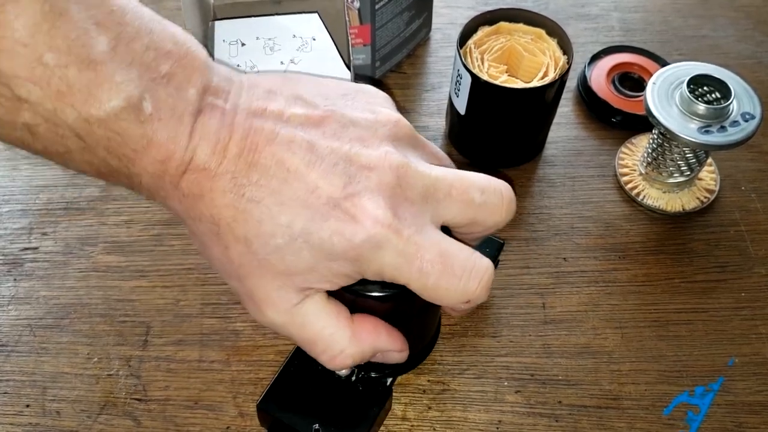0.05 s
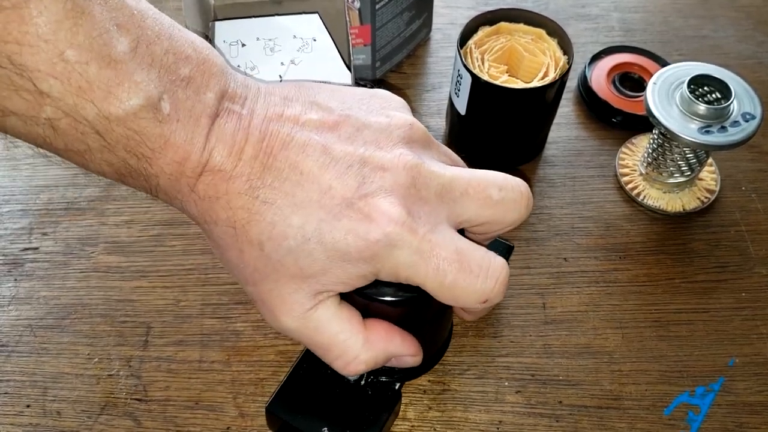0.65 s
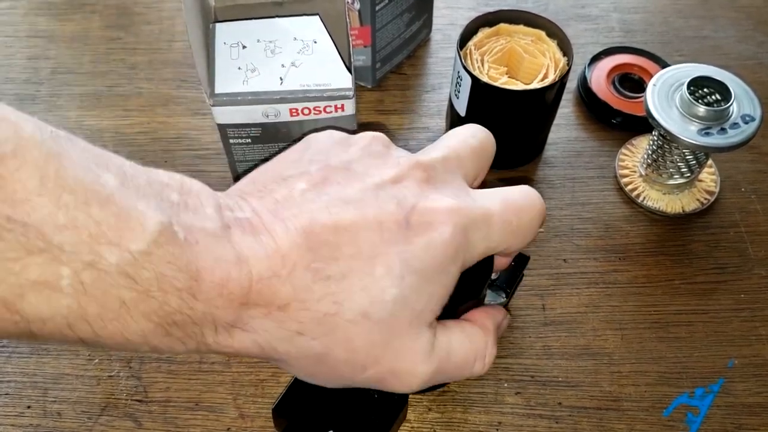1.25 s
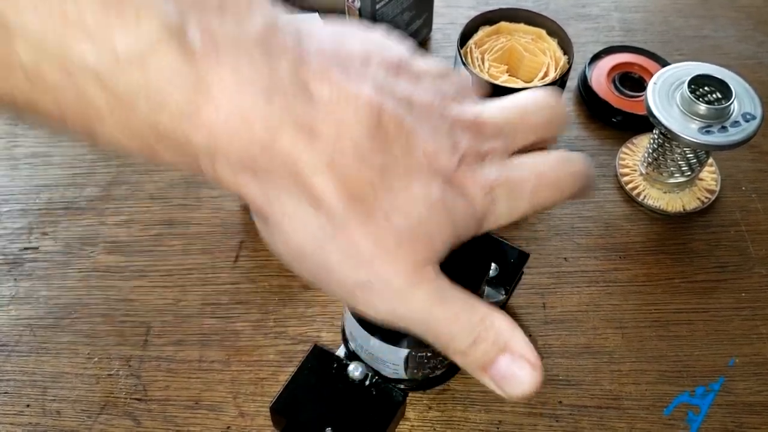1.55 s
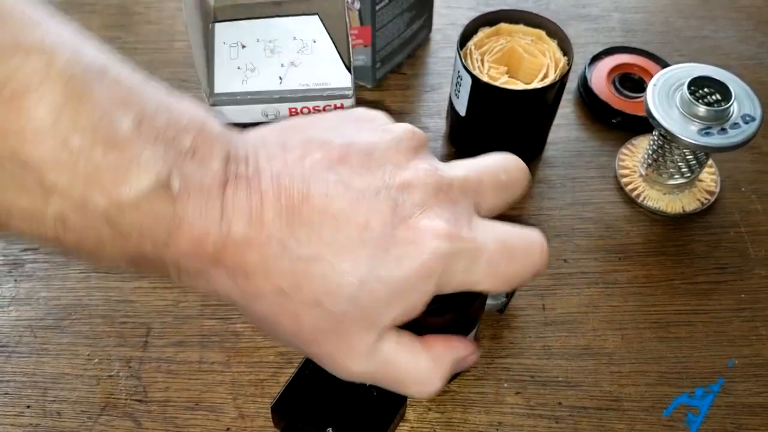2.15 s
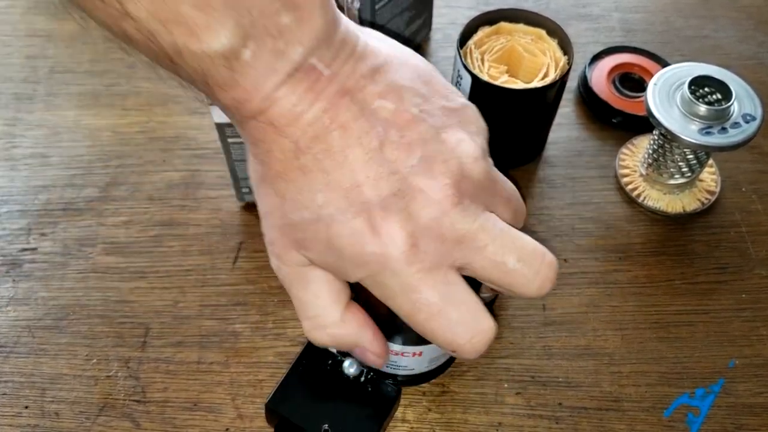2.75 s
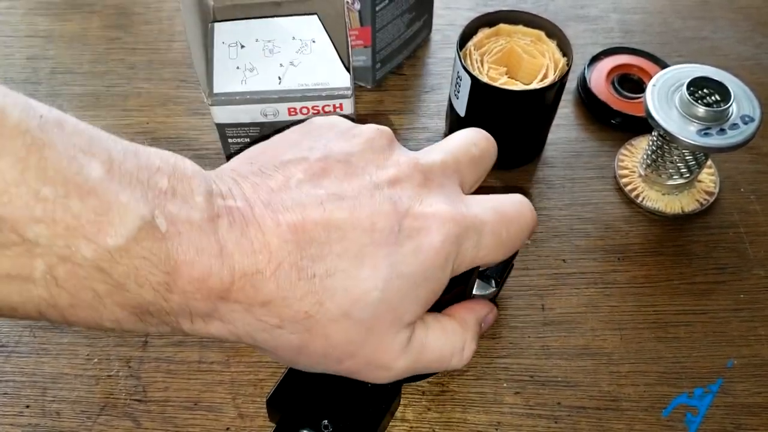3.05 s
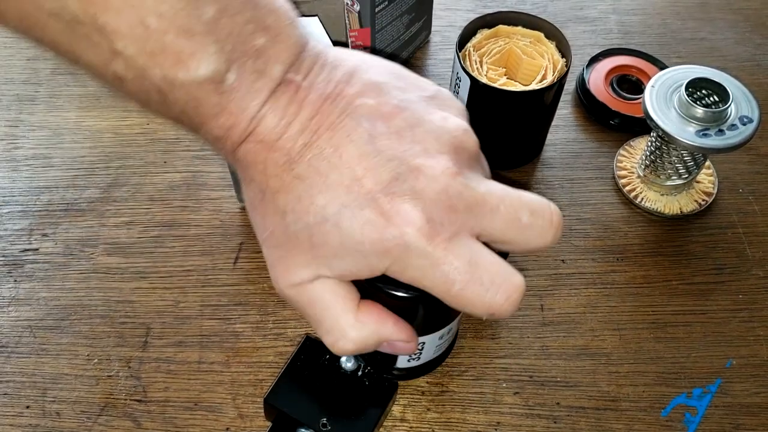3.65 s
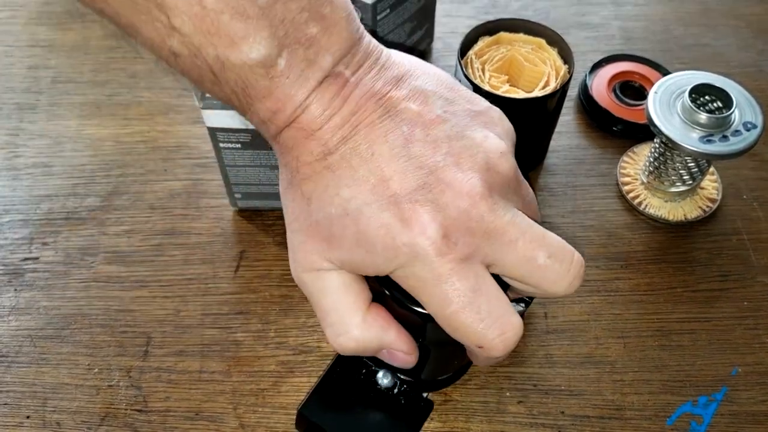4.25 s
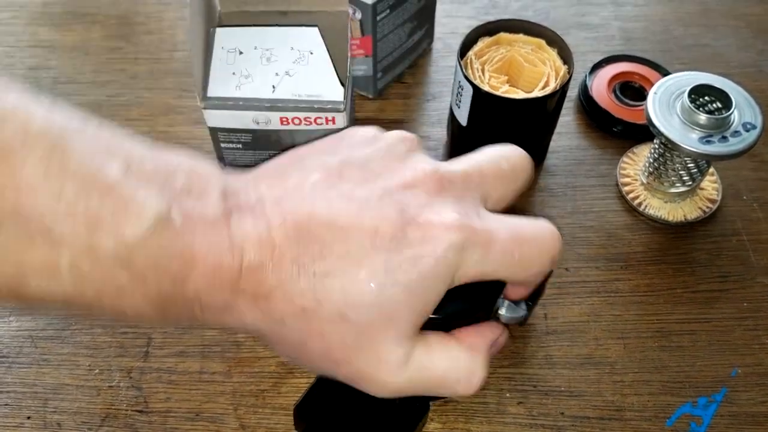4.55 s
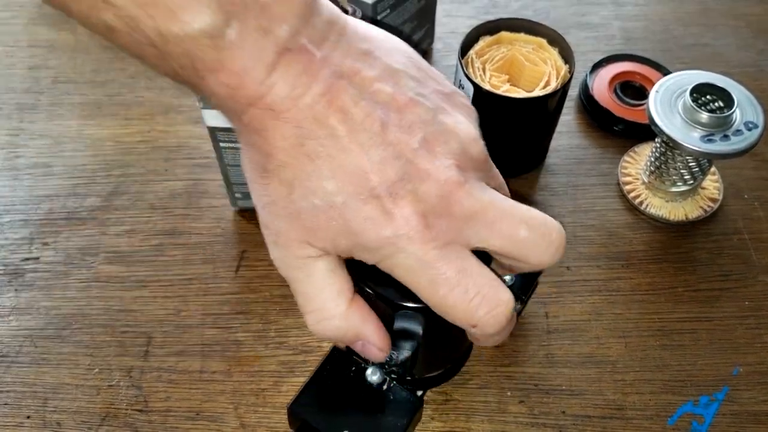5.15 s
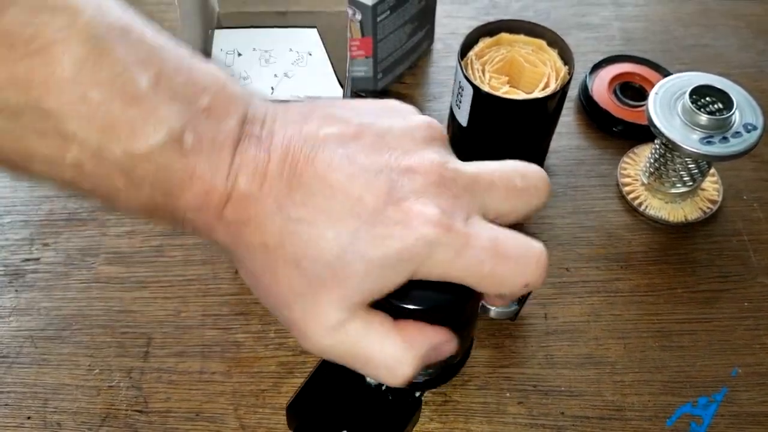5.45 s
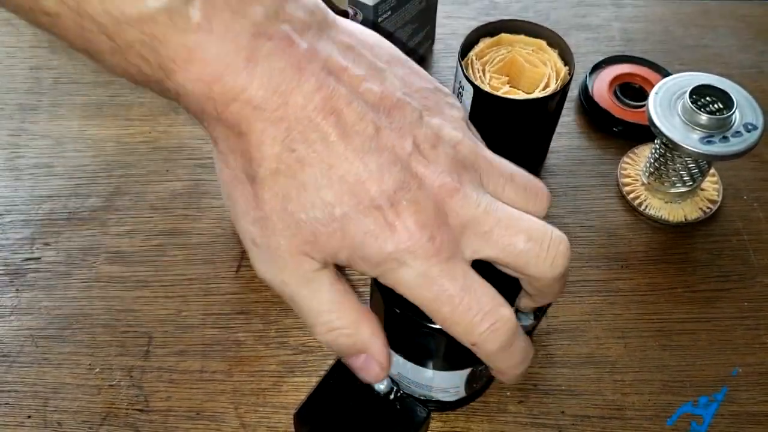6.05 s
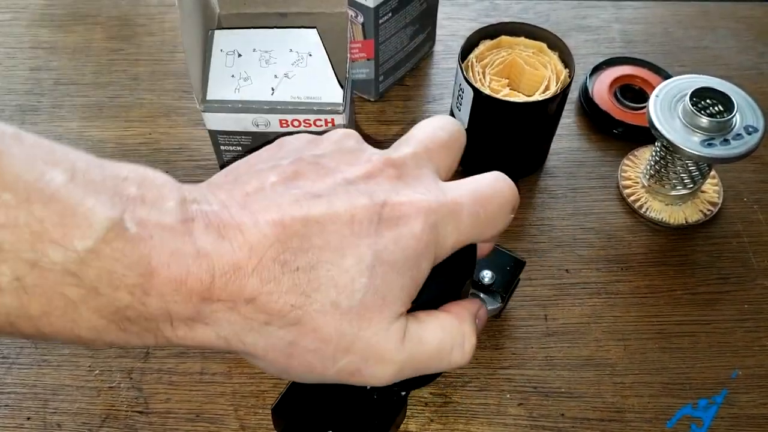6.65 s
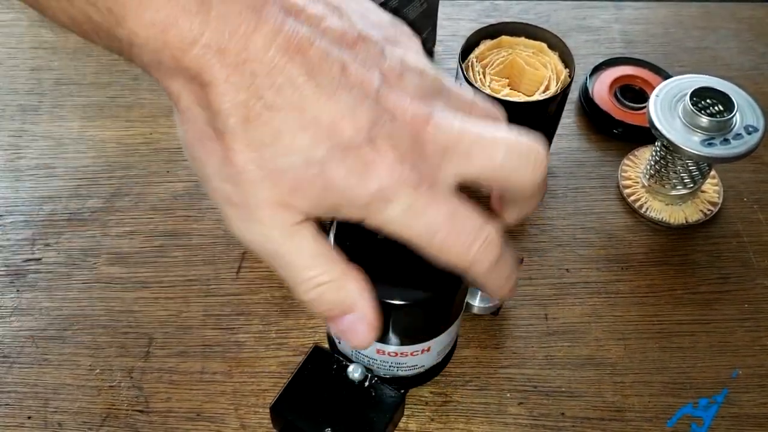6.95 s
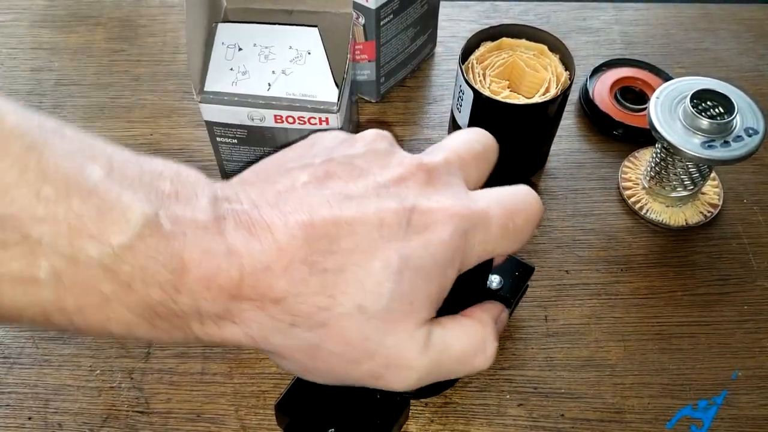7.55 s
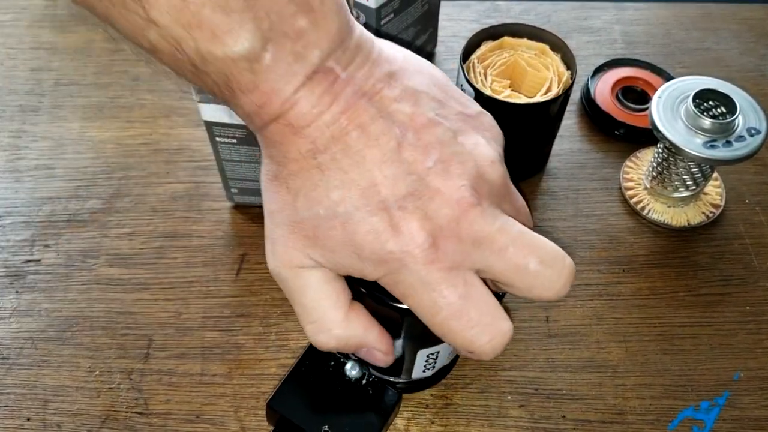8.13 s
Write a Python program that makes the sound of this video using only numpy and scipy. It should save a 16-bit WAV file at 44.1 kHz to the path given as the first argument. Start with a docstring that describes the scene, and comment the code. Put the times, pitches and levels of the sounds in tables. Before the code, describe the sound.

A hand twists a steel oil filter against a cutting wheel on a wooden bench, regripping about once a second. At first the wheel rumbles softly, the can knocks in its jig, and sliding skin and faint clicks come between. From about halfway, the wheel snaps loudly past the torn edge on each turn, with a brief metallic ring. A last quiet twist follows, heard in stereo in a quiet garage.

```python
"""A garage, a stereo pair of microphones at a wooden bench: a hand twists a steel oil filter against a
cutting wheel, regripping about once a second. At first the wheel rumbles in its groove, the can knocks
in the jig, skin and steel hiss softly as they slide, and snaps are faint. From about 4.6 s the wall is
cut through and the wheel snaps loudly past the torn edge on every turn. A last, quiet twist follows."""
import sys
import numpy as np
from scipy import signal
from scipy.fft import rfft, irfft, next_fast_len
from scipy.io import wavfile
from scipy.ndimage import uniform_filter1d

SR = 44100
rng = np.random.default_rng(int(sys.argv[2]) if len(sys.argv) > 2 else 0)


def generate_wav(signal):
    """Clip the signal to [-1, 1] and save it as 16-bit WAV at the path in sys.argv[1]."""
    frames = np.transpose(np.atleast_2d(signal))
    scaled = np.clip(frames, -1, 1) * 32767
    pcm = np.round(scaled).astype(np.int16)
    wavfile.write(sys.argv[1], SR, pcm)


N = 369990
BLOW, ATTACK = 16384, 1100  # samples: a whole blow, and the opening that sets its level

# modes of bench, jig and can: f/Hz, level/dB, t60/s
BENCH_MODES = [(55, -11, 0.017), (94.27, -0.5, 0.17), (163, 0.5, 0.081), (220.5, 5, 0.14), (288.2, 3, 0.12),
               (331.4, -8.5, 0.027), (363.2, 3.5, 0.14), (410, -6, 0.27), (475, -7, 0.21), (543, -3, 0.02),
               (657, -4, 0.023), (753, -17, 0.058), (934.4, -15, 0.19), (984, -13, 0.22), (1258, -17, 0.3),
               (1413, -12.5, .08), (1550, -23.5, 0.012)]
# spectrum of steel cracking under the wheel: f/Hz, level/dB
CRACK_SPECTRUM = [(300, -26), (1000, -9.5), (2200, -7), (4500, -1.5), (7500, 6), (9000, -1.5), (12000, 5),
                  (16000, -7.5)]
# twists of the hand: t/s, length/s, rumble/dB, length of the first bite/s, its scrape/dB, its hiss/dB
TWISTS = [(0.4, 0.27, -53.5, 0.16, -68, -111), (1.124, 0.25, -42, 0.11, -61, -70),
          (2.127, 0.38, -49, 0.21, -67, -65.5), (2.71, 0.72, -48.5, 0.12, -67.5, -75),
          (3.575, 0.13, -57, 0.26, -74, -76), (4.249, 0.72, -49.5, 0.054, -55.5, -80.5),
          (5.267, 0.81, -53.5, 0.0705, -59, -72.5), (6.22, 0.76, -52, 0.14, -53.5, -69.5),
          (7.181, 0.84, -53, 0.11, -69, -77.5), (8.146, 0.59, -56, 0.094, -58, -70.5)]


def amp(db):
    return 10 ** (np.asarray(db) / 20)


def unit(x, start=0, end=None):
    """Scales a sound to rms 1 over a stretch of samples."""
    return x / np.sqrt(np.mean(x[..., start:end] ** 2) + 1e-20)


def curve(points, hz):
    """Joins points by straight lines over log frequency."""
    f, value = np.transpose(points)
    return np.interp(np.log(hz + 1), np.log(f + 1), value)


def add(mix, s, sound):
    """Lays a sound into the mix at time s."""
    part = mix[:, max(0, round(s * SR)):][:, :sound.shape[1]]
    part += sound[:, :part.shape[1]]


def diffuse(spectrum, size, count=1, tilt=0):
    """Noises at both microphones, count x 2 x size; tilt is in dB per octave above 5 kHz."""
    # likeness of the microphones, high in the bass: f/Hz, correlation
    likeness = [(30, 0.95), (70, .94), (150, .92), (330, 0.64), (640, 0.39), (1400, 0), (15000, 0.0019)]
    length = next_fast_len(size, real=True)
    hz = np.fft.rfftfreq(length, 1 / SR)
    bins = rng.standard_normal((count, 2, 2 * len(hz)), dtype=np.float32).view(np.complex64)
    same = np.clip(curve(likeness, hz), -1, 1)
    bins[:, 1] = same * bins[:, 0] + np.sqrt(1 - same ** 2) * bins[:, 1]
    tilt_db = np.reshape(tilt, (-1, 1, 1)) * np.log2(np.maximum(hz / 5000, 1))
    gain = np.float32(amp(curve(spectrum, hz) + tilt_db))
    return unit(irfft(bins * gain, length)[..., :size])


def grit(per_s, spread_db, decay_s):
    """Envelope of random catches of uneven size, each swelling and dying quickly."""
    catches = (rng.random(N) < per_s / SR) * amp(spread_db * np.minimum(rng.exponential(1, N), 3))
    power = signal.lfilter([1], [1, -np.exp(-2 / (decay_s * SR))], catches ** 2)
    return unit(uniform_filter1d(np.sqrt(power), max(1, int(decay_s * SR / 4))))


def ringing(modes):
    """One dying sine for each mode."""
    hz, db, t60 = np.transpose(modes)[:, :, None]
    t = np.arange(BLOW) / SR
    return amp(db - 60 * t / t60) * np.sin(2 * np.pi * hz * t)


def resonant(spectrum, modes, peak_db):
    """Raises a spectrum around each mode: the body colours whatever passes through it."""
    hz = np.geomspace(20, 16000, 3000)
    peaks = np.max([1 / (1 + ((hz - f) * t60 / 1.1) ** 2) for f, _, t60 in modes], axis=0)
    return np.c_[hz, curve(spectrum, hz) + peak_db * peaks]


def favour(x, hz, q):
    """The point of contact favours the range around one pitch."""
    return signal.lfilter(*signal.iirpeak(hz, max(q, 2.5 * hz / SR), SR), x)


def swing(hz, decay_cycles=0.72):
    """A push that swells and is damped within a few swings."""
    cycles = hz * np.arange(BLOW) / SR
    return unit(cycles * np.exp(-cycles / decay_cycles) * np.sin(2 * np.pi * cycles), end=ATTACK)


def effort(t, rest_db=-76, ease_db=15):
    """The hand's force at times t: it arches over each twist, ease_db weaker at both ends."""
    start, length, db = np.transpose(TWISTS)[:3, :, None]
    return amp(rest_db) + amp(db - ease_db * (2 * (t - start) / length - 1) ** 2).sum(0)


def room_tone(level_db=-76.5):
    """The quiet, steady air of the garage all around the microphones."""
    # spectrum of the air: f/Hz, level/dB
    air_spectrum = [(20, -12.5), (60, -2), (100, -3.5), (200, -11), (350, -15.5), (520, -24.5),
                    (1000, -29.5), (1900, -28), (2600, -21.5), (3400, -37.5), (5200, -34), (7400, -26),
                    (9000, -34.5), (15500, -33)]
    return amp(level_db) * diffuse(air_spectrum, N)[0]


def garage_tails(spectrum, count, rise_s, tilt=0):
    """One fresh reverberation for each blow, every band dying at its own speed."""
    # reverberation of the garage: f/Hz, t60/s
    reverb_times = [(90, 0.38), (450, 0.31), (4000, 0.29), (14000, 0.21)]
    t, hz = np.arange(BLOW) / SR, np.fft.rfftfreq(BLOW, 1 / SR)
    noise = rfft(diffuse(spectrum, BLOW, count, tilt))
    centres, t60s = np.transpose(reverb_times)
    bands = np.float32([curve(np.c_[centres, share], hz) for share in np.eye(len(centres))])
    fades = np.float32(amp(-60 * t / t60s[:, None]) * (1 - np.exp(-t / rise_s)))
    return sum(irfft(noise * band) * fade for band, fade in zip(bands, fades))


def burr_ticks(gain_db=-31):
    """Burrs in the groove catch the wheel: sparse tiny ticks that follow the effort."""
    ticks = diffuse(CRACK_SPECTRUM, N, tilt=-5)[0] * grit(per_s=34, spread_db=3, decay_s=0.005)
    return ticks * effort(np.arange(N) / SR) * amp(gain_db)


def friction(scrape_gain_db=1, hiss_gain_db=-1, drag_scrape_db=-25, drag_hiss_db=-28.5):
    """The wheel scrapes and skin hisses on paint, swelling at each bite or slip over a turning drag."""
    # the fingers slip over the paint: t/s, length/s, scrape/dB, hiss/dB
    slips = [(0, 0.18, -67, -76), (0.858, 0.19, -64, -63), (1.45, 0.2, -57, -68),
             (1.867, 0.14, -108, -77.5), (2.432, 0.15, -68.5, -72.5), (2.91, 0.093, -57.5, -76),
             (3.227, 0.17, -59, -72.5), (4.398, 0.25, -65, -75), (5.533, 0.17, -47, -53),
             (7.399, 0.088, -62, -72), (8.275, 0.13, -69, -76.5)]
    # grainy scrape of the wheel: f/Hz, level/dB
    scrape_spectrum = [(150, -6), (380, 6), (520, -5.5), (820, -5), (1250, -10.5), (1900, -16.5),
                       (2600, -19.5), (4000, -28), (8000, -42.5), (14000, -59.5)]
    # smoother hiss of skin: f/Hz, level/dB
    skin_spectrum = [(600, -11), (1800, -2), (2600, 1.5), (4200, -2), (7600, 4), (8900, -5), (11600, 0.5),
                     (16000, -7.5)]
    bites = [(start, length, scrape, hiss) for start, _, _, length, scrape, hiss in TWISTS]
    start, length, scrape_db, hiss_db = np.transpose(bites + slips)[:, :, None]
    frames, t = np.arange(0, N, 128) / SR, np.arange(N) / SR
    strokes = np.exp(-(2 * (frames - start) / length - 1) ** 2)
    scrape = (amp(scrape_db + scrape_gain_db) * strokes).sum(0) + amp(drag_scrape_db) * effort(frames)
    hiss = (amp(hiss_db + hiss_gain_db) * strokes).sum(0) + amp(drag_hiss_db) * effort(frames)
    wheel = diffuse(resonant(scrape_spectrum, BENCH_MODES, peak_db=5), N)[0]
    wheel = wheel * grit(per_s=130, spread_db=3, decay_s=0.028)
    skin = diffuse(skin_spectrum, N)[0] * grit(per_s=2400, spread_db=6.5, decay_s=0.0037)
    return wheel * np.interp(t, frames, scrape) + skin * np.interp(t, frames, hiss)


def wheel_rumble(gain_db=-3):
    """The wheel bumps along its groove and shakes the bench."""
    # rumble of the rolling wheel: f/Hz, level/dB
    roll_spectrum = [(25, -13), (55, -7), (93, 4), (125, 3.5), (220, -3), (350, -4), (500, -20),
                     (800, -22.5), (1250, -32.5), (2500, -33), (6000, -51.5), (12000, -74)]
    rumble = diffuse(resonant(roll_spectrum, BENCH_MODES, peak_db=8), N)[0]
    bumps = grit(per_s=46, spread_db=5, decay_s=0.038)
    return rumble * bumps * effort(np.arange(N) / SR) * amp(gain_db)


def cutter_clinks(t60=0.06, pair_ratio=0.98, rise_s=0.0006):
    """A close pair of steel modes, soon damped by the fingers."""
    # the cutter's steel parts touch: t/s, f/Hz, level/dB
    touches = [(2.994, 1015, -29.5), (3.997, 1890, -54), (5.468, 2120, -43.5), (7.676, 2970, -49.5)]
    out, t = np.zeros((2, N)), np.arange(BLOW) / SR
    for s, hz, db in touches:
        phase = 2 * np.pi * rng.random((2, 2, 1))
        ring = np.sin(2 * np.pi * hz * t + phase[0]) + np.sin(2 * np.pi * hz * pair_ratio * t + phase[1])
        add(out, s, amp(db - 60 * t / t60) * (1 - np.exp(-t / rise_s)) * ring)
    return out


def jolts(count=26, low_hz=90, high_hz=320, clack_db=-14.5):
    """Rows for small knocks at random moments, as strong as the hand's effort."""
    when, pitch = rng.random((count, 2)).T
    s = (np.arange(count) + when) / count * N / SR
    thud_db = 20 * np.log10(effort(s))
    return list(zip(s, thud_db, low_hz * (high_hz / low_hz) ** pitch, thud_db + clack_db))


def jig_knocks(thud_gain_db=-1.03, clack_gain_db=-2, split_hz=520, tap_s=0.0028, hard_db=-50):
    """Each knock pushes the bench and taps the can: the low modes thud, the high ones clack."""
    # the can knocks in the jig: t/s, thud/dB, thud f/Hz, clack/dB
    knocks = [(0.029, -45, 324, -51), (0.191, -39, 335, -46), (0.728, -51.5, 222, -62),
              (0.912, -53.5, 214, -84), (1.148, -41.5, 166, -53), (1.158, -37.5, 195, -39),
              (1.315, -38.5, 167, -46.5), (1.613, -46, 189, -69.5), (1.938, -59, 82, -79.5),
              (2.19, -44.5, 157, -74), (2.255, -50, 156, -54.5), (2.432, -51, 213, -76),
              (2.596, -54.5, 269, -65), (2.728, -48, 100, -85), (2.879, -57, 263, -62),
              (2.9935, -41.5, 340, -36.5), (3.037, -30, 276, -36.5), (3.334, -36.5, 193, -58.5),
              (3.514, -53, 90.2, -97), (3.659, -44.5, 296, -52.5), (3.8144, -39, 328, -49),
              (3.93, -42, 337, -46.5), (3.999, -48, 338, -56.5), (4.25, -51.5, 329, -59),
              (4.585, -44.5, 180, -54), (4.6528, -25, 343, -38), (4.66, -25.5, 300, -27.5),
              (4.988, -48.5, 297, -67), (5.285, -52, 145, -61), (5.463, -32.5, 110, -43.5),
              (5.565, -38.5, 301, -46.5), (5.608, -32.5, 165.5, -42.5), (5.914, -59.5, 292, -70),
              (6.19, -50.5, 107.6, -88), (6.522, -32, 220, -36.5), (6.746, -48.5, 171, -52.5),
              (7.121, -57, 93, -79), (7.469, -29.5, 231.5, -35.5), (7.676, -50, 225, -51),
              (8.028, -58.5, 207, -71), (8.185, -51, 113, -58.5)]
    # spectrum of a knock's tap and its boom in the garage: f/Hz, level/dB
    boom_spectrum = [(25, -25), (55, -10), (93, 13), (125, 0), (220, 1), (365, 2.5), (470, -7), (650, -3.5),
                     (980, -11), (1350, -18), (2400, -17), (4000, -18.5), (8000, -39.5)]
    blows = knocks + jolts()
    out, t, rings = np.zeros((2, N)), np.arange(BLOW) / SR, ringing(BENCH_MODES)
    low, high = (signal.butter(4, split_hz, kind, fs=SR, output="sos") for kind in ("low", "high"))
    rooms = garage_tails(resonant(boom_spectrum, BENCH_MODES, peak_db=6), len(blows), rise_s=0.0044)
    taps = diffuse(boom_spectrum, BLOW, len(blows)) * t * np.exp(-t / tap_s)
    sway = amp(-9) * swing(hz=84)  # the whole bench top gives
    for (s, thud_db, thud_hz, clack_db), room, tap in zip(blows, rooms, taps):
        clack_hz = 700 * 2 ** (max(clack_db - hard_db, 0) / 24.5)  # hard clacks rise in pitch
        scatter_db = 2 * rng.standard_normal(len(rings))
        body = unit(amp(scatter_db) @ rings, end=ATTACK)
        push = amp(-5) * swing(thud_hz)  # damped by the hand
        room = unit(room, end=ATTACK)
        bench = unit(favour(body + push + amp(-1) * room, thud_hz, q=0.73), end=ATTACK) + sway
        can = favour(body + amp(-1) * unit(tap, end=ATTACK) + room, clack_hz, q=0.77)
        add(out, s, amp(thud_db + thud_gain_db) * unit(signal.sosfilt(low, bench), end=ATTACK))
        add(out, s, amp(clack_db + clack_gain_db) * unit(signal.sosfilt(high, can), end=ATTACK))
    return out


def edge_snaps(crack_gain_db=-2.4, wall_db=-10, crack_s=0.00095, swell_s=0.0029, chatter_s=0.031):
    """A faint hiss swells, the wheel cracks past the torn edge and chatters, can and garage ring."""
    # the wheel slips on the cut edge: t/s, crack/dB, ring/dB, treble tilt/(dB per octave)
    snaps = [(0.1923, -48.5, -63, -3.5), (0.4995, -58.5, -76, -36), (1.161, -37, -48.5, -17.5),
             (1.314, -41.5, -59.5, -5.5), (1.533, -48, -71, 5), (1.8452, -61, -74.5, -4),
             (2.9026, -52.5, -58, -0.8), (2.9944, -55, -62, -11), (3.0444, -44.5, -52.5, -3),
             (3.8292, -57, -70, -7.5), (3.9332, -48.5, -63.5, 0.5), (4.6356, -19.5, -37, 0),
             (4.6614, -26.5, -42.5, -10), (4.715, -26.5, -49.5, -2), (4.8877, -62, -71.5, 1),
             (4.973, -60, -75.5, -8), (5.4667, -33, -46.5, -18.5), (5.604, -17, -31, 2.5),
             (6.5188, -18.5, -30.5, 0), (6.7447, -41, -59, -6.5), (7.4657, -20.5, -31, -1),
             (7.6761, -33.5, -55.5, -2.5)]
    # wall modes of the steel can: f/Hz, level/dB, t60/s
    wall_modes = [(1163, -3.5, 0.044), (1739, -5, 0.062), (2017, -2, 0.15), (2380, 0, 0.14), (2796, 0, 0.1),
                  (3030, -0.5, .09), (3495, -1.5, 0.099), (4400, -1.5, 0.11), (5040, -2.5, .09),
                  (5560, -4.5, 0.064), (6024, -1, .09), (7070, -1, 0.12), (7400, -1.5, 0.073),
                  (7200, 3, 0.067), (8100, -4, 0.083), (12800, -4.5, 0.074)]
    # spectrum of a snap ringing in the garage: f/Hz, level/dB
    ring_spectrum = [(250, -14), (500, 2), (1000, 0.5), (1500, -6), (2000, -3.5), (3200, -3), (4600, -3.5),
                     (6000, -2.5), (7700, 1.5), (9000, -6.5), (11500, -3.5), (14500, -7.5), (16000, -12.5)]
    out, rings, tilts = np.zeros((2, N)), ringing(wall_modes), np.array(snaps)[:, 3]
    hiss_s = 0.012  # the faint hiss starts this long before each crack
    t = np.arange(BLOW) / SR - hiss_s - crack_s
    hiss_and_chatter = amp(-20) * np.exp(-abs(t) / np.where(t < 0, swell_s, chatter_s))
    burst = np.exp(-(t / crack_s) ** 2) + hiss_and_chatter
    cracks = diffuse(CRACK_SPECTRUM, BLOW, len(snaps), tilts) * burst
    ring_colour = resonant(ring_spectrum, wall_modes, peak_db=5)
    rooms = garage_tails(ring_colour, len(snaps), rise_s=0.0016, tilt=tilts)
    for (s, crack_db, ring_db, _), crack, room in zip(snaps, cracks, rooms):
        wall = unit(rng.standard_normal((2, len(rings))) @ rings, end=ATTACK)
        crack = unit(crack, round(hiss_s * SR), round((hiss_s + 0.0015) * SR))
        add(out, s - hiss_s, amp(crack_db + crack_gain_db) * crack)
        add(out, s, amp(ring_db) * (unit(room, end=ATTACK) + amp(wall_db) * wall))
    return out


def scene():
    """The cutter at work on the bench, over the quiet air of the garage."""
    impacts = jig_knocks() + edge_snaps() + cutter_clinks()
    return impacts + wheel_rumble() + friction() + burr_ticks() + room_tone()


def record(dry, cutoff_hz=16200):
    """The stereo pair: the left microphone is a little louder in most bands; the top treble is cut."""
    # balance of the microphones: f/Hz, left minus right/dB
    balance = [(30, -6), (80, 2), (170, 4.5), (350, 4.5), (700, -0.5), (1400, 3.5), (2800, 4), (8000, 2),
               (14000, 5)]
    lean_db = curve(balance, np.fft.rfftfreq(N, 1 / SR)) / 2
    heard = irfft(rfft(dry) * amp([lean_db, -lean_db]), N)
    lowpass = signal.firwin(401, cutoff_hz, window=("kaiser", 9), fs=SR)
    return signal.oaconvolve(heard, lowpass[None], "same")


dry = scene()
out = record(dry)
generate_wav(out)
```